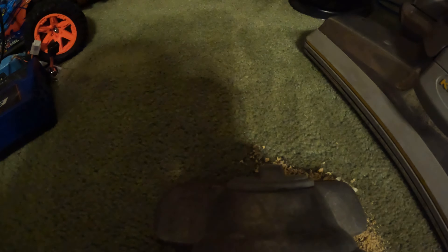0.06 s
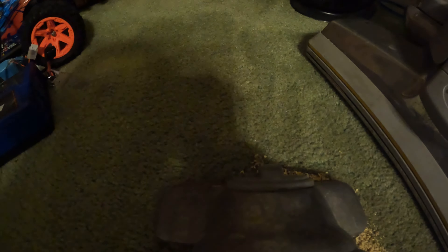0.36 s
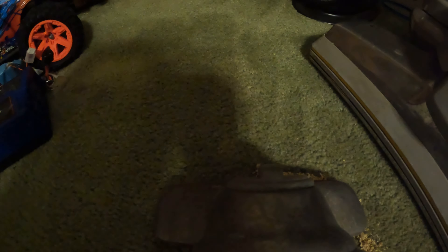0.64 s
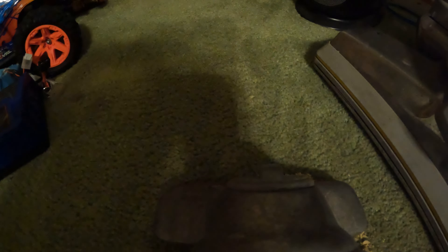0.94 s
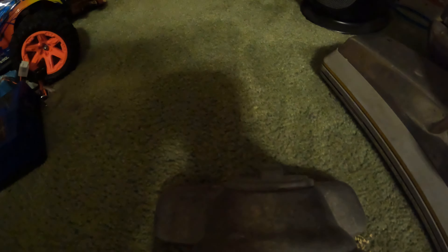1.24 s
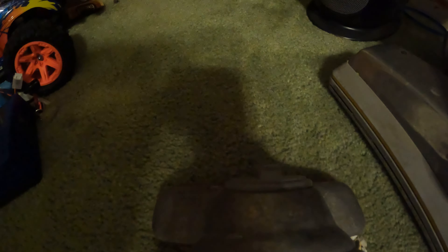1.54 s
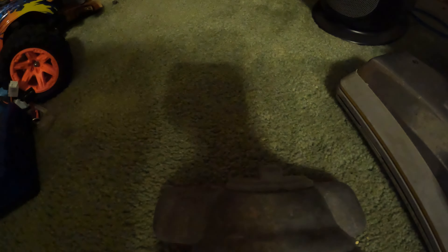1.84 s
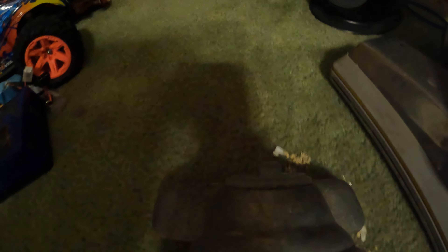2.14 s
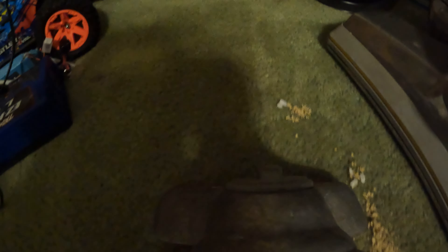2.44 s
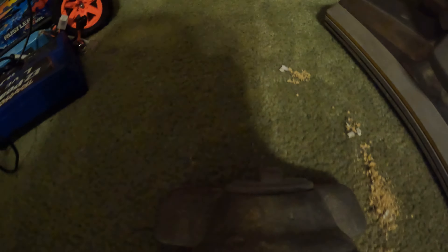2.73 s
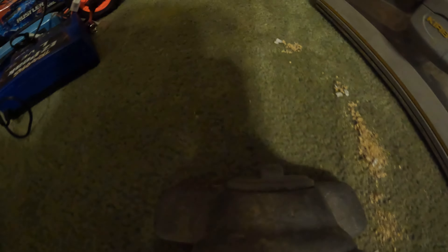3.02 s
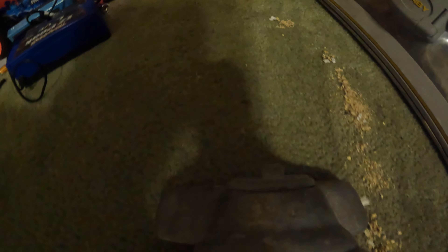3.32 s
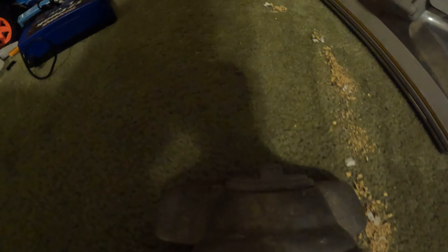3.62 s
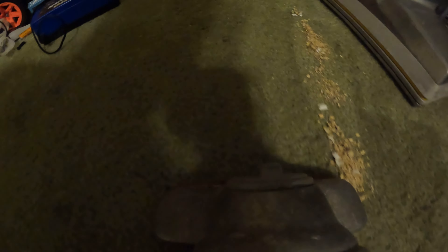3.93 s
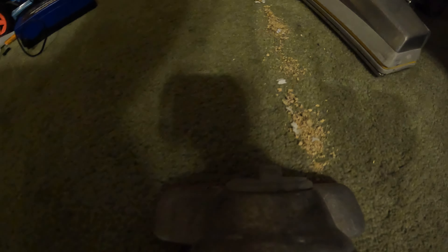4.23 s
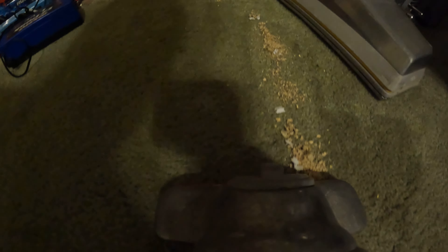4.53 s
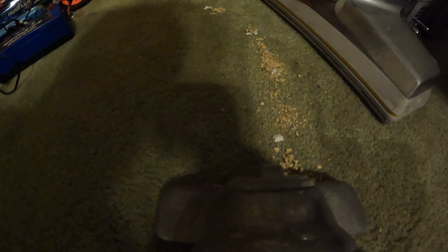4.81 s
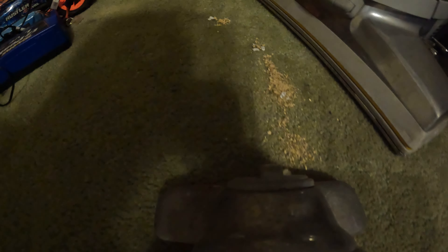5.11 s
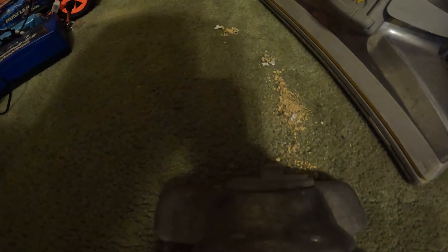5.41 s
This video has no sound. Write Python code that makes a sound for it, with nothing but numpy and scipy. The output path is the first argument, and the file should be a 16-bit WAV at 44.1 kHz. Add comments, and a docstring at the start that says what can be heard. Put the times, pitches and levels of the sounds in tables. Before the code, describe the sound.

An upright vacuum cleaner runs over carpet with a steady motor hum and rushing air, crumbs ticking up its plastic intake.

```python
"""An upright vacuum cleaner is pushed over carpet in a small room, picking up spilled crumbs.
From the start its motor hums at the rotation rate and beats against the mains ripple, turbulent air
rushes through resonant ducts, the belt-driven brush roll drones, and grit rings the plastic intake.
Near 2 s the roll digs in; drawn back, it runs faster and louder while the grit thins out.
Near 4.4 s the cleaner is pushed again, the roll digs in briefly, and the last crumbs follow after 5 s."""
import sys
import numpy as np
from scipy import signal
from scipy.fft import rfft, irfft
from scipy.io import wavfile
from scipy.ndimage import map_coordinates

SR = 44100
rng = np.random.default_rng(int(sys.argv[2]) if len(sys.argv) > 2 else 0)


def store_wav(level_fs):
    """Save 16-bit WAV to argv[1]."""
    pcm = np.round(np.clip(np.atleast_2d(level_fs), -1, 1) * 32767)
    wavfile.write(sys.argv[1], SR, pcm.T.astype(np.int16))


N = 249606
TIME = np.arange(N) / SR
FREQS = np.fft.rfftfreq(N, 1 / SR)
SIDE = np.array([[.5], [-.5]])  # shares a difference between left and right


def from_db(db):
    return 10 ** (np.asarray(db) / 20)


def unit_rms(x):
    return x / np.sqrt(np.mean(x ** 2) + 1e-20)


def in_time(curve):
    """Linear interpolation of a curve at every sample."""
    return np.interp(TIME, *np.transpose(curve))


def in_frequency(curve):
    """Interpolation of a spectrum on a log-frequency axis."""
    hz, value = np.transpose(curve)
    return np.interp(np.log1p(FREQS), np.log1p(hz), value)


def drift(corner_hz):
    """Low-pass noise: a slow random fluctuation of unit rms."""
    return unit_rms(irfft(rfft(rng.standard_normal(N)) / (1 + (FREQS / corner_hz) ** 2), N))


def bump(centre_s, half_s):
    """A Gaussian pulse of height 1."""
    return np.exp(-((TIME - centre_s) / half_s) ** 2)


def shaft_angle(speed_hz):
    """Angle is the time integral of rotation rate."""
    return 2 * np.pi * np.cumsum(speed_hz) / SR


def stereo_tone(phase, rms_db, pan_db, lead_rad):
    """A sinusoid placed by level and phase differences between the sides."""
    return np.sqrt(2) * from_db(rms_db + SIDE * pan_db) * np.cos(phase + SIDE * lead_rad)


# rotation rate of the motor: t/s, f/Hz
MOTOR_SPEED = [(0.0, 247.4), (0.59, 246.91), (1.84, 248.24), (2.94, 249.83), (4.83, 250.46), (5.13, 248.46),
               (5.66, 248.18)]


def motor_motion(ripple_hz=120, first_throb_s=0.02703, choke_db_per_hz=0.13):
    """Rotor phase, mains ripple phase and flow level. Fan loading: choked, it spins up and moves less air."""
    speed = in_time(MOTOR_SPEED)
    rotor = shaft_angle(speed) - 2 * np.pi * (speed[0] - 2 * ripple_hz) * first_throb_s
    ripple = 2 * np.pi * ripple_hz * TIME
    flow_db = 0.08 - choke_db_per_hz * (speed - speed.mean())
    return rotor, ripple, flow_db


# tones at order * rotation rate + sideband * ripple rate: order, sideband, level/dB, left-right/dB
MOTOR_TONES = [(0, 1, -47.5, -2), (-1, 4, -40.2, -5), (0, 2, -29.8, -5), (1, 0, -20.8, -7),
               (2, -2, -40.9, -6), (0, 3, -44, -2), (1, 1, -42.5, 1), (2, -1, -32.6, 0), (3, -3, -42.2, -4),
               (1, 2, -36.5, -2), (2, 0, -30.4, -3), (1, 3, -35.3, -1), (2, 1, -29.1, 1),
               (3, -1, -32.6, -2), (4, -3, -37, -4), (0, 6, -41.5, -8), (1, 4, -37, -6), (2, 2, -31.2, -12),
               (3, 0, -25.6, -13), (4, -2, -35.5, -8), (5, -4, -37.5, -3), (2, 3, -43, -6),
               (3, 1, -42.4, -9), (3, 2, -44, 2), (3, 3, -46.3, 0), (5, 0, -39.5, -2), (6, -1, -42.8, -5),
               (4, 5, -43, 0), (6, 1, -41, 2)]
# clusters by ripple multiple: lead on the throb/rad, warble/rad (0 beats in level, pi / 2 in pitch)
CLUSTER_BEATS = {2: (-0.95, -0.95), 4: (0.9, 1.8), 5: (-0.7, 1.45), 6: (-1.72, 1.72)}


def motor_hum(rotor, ripple):
    """Modulation: torque ripple gives rotor harmonics sidebands; neighbours beat at about 7-10 Hz."""
    start = rng.uniform(0, 2 * np.pi, 32)
    out = 0
    for order, sideband, db, pan_db in MOTOR_TONES:
        cluster = 2 * order + sideband  # nearest multiple of the ripple rate
        _, strongest = max((level, k) for k, m, level, _ in MOTOR_TONES if 2 * k + m == cluster)
        ahead, warble = CLUSTER_BEATS.get(cluster, (0, np.pi / 2))
        offset = ahead * (order - strongest) + warble * abs(order - strongest)
        phase = order * rotor + sideband * ripple + start[cluster] + offset
        waver_db = (0.14 + 0.12 * order) * drift(1.7)
        out += stereo_tone(phase, db - waver_db, pan_db, lead_rad=0.89)
    return out


def fan_whine(rotor, ripple, sideband_spread=3.26, size=1024):
    """Double periodicity, in rotor angle and ripple phase, splits each high harmonic into sidebands."""
    orders, sidebands = np.arange(5, 26)[:, None], np.arange(-6, 7)
    phases = rng.uniform(0, 2 * np.pi, (len(orders), len(sidebands)))
    lines = np.zeros((size, size // 8), complex)
    lines[orders, sidebands] = np.exp(-.5 * (sidebands / sideband_spread) ** 2 + 1j * phases)
    pattern = np.fft.ifft2(lines).real  # pressure over one rotor turn and one ripple cycle
    where = [phase / (2 * np.pi) % 1 * steps for phase, steps in zip((rotor, ripple), pattern.shape)]
    return unit_rms(map_coordinates(np.pad(pattern, (0, 1), mode="wrap"), where, order=1))


def room(x, wet_db, t60_s=0.13):
    """Reverberation: reflections off carpet and furniture decay exponentially, different on each side."""
    t = TIME[:N // 16]
    tail = rng.standard_normal((2, len(t))) * from_db(-60 * t / t60_s) * (t > .003)
    tail /= np.sqrt(np.sum(tail ** 2, axis=1, keepdims=True))
    return from_db(wet_db) * signal.fftconvolve(np.atleast_2d(x), tail, axes=1)[:, :N]


# spectral density of the rushing air: f/Hz, relative level/dB
AIR_SPECTRUM = [(20, -74), (130, -74.6), (220, -57), (450, -54), (800, -54), (1000, -62.5), (1750, -61.5),
                (2050, -72), (3300, -75.5), (5500, -80.5), (6800, -89), (8200, -100), (9000, -106.5),
                (15000, -128)]
# resonances of ducts and housing: f/Hz, width/Hz, gain/dB
DUCT_MODES = [(518, 52, 3.5), (756, 170, 6.5), (1310, 187, 5), (1553, 233, 7.5), (2286, 113, 8),
              (2769, 503, 19.5), (3594, 340, 9), (4040, 200, 7), (4966, 310, 7.5), (5453, 170, 10.5),
              (6150, 190, 6), (7700, 577, 9)]
# bands of hiss that swell with the motor's throb: f/Hz, half width/Hz, depth, lead on the throb/rad
THROB_BANDS = [(1500, 230, 0.11, 2.8), (2650, 680, 0.18, 3.4), (3760, 710, 0.18, 1.1),
               (5420, 780, 0.48, 2.1), (7200, 990, 0.09, 0.43)]
# level difference of the air noise: f/Hz, left-right/dB
AIR_BALANCE = [(60, 1.5), (87, -6.5), (130, -1), (180, -1), (270, -6.5), (390, 1), (570, -4), (820, -5),
               (1190, -2.5), (1740, 2.5), (2520, 6), (3660, -1), (5330, -2.5), (7740, 0)]
# phase difference of the air noise: f/Hz, lead of the left/rad
AIR_LEAD = [(0, 0.36), (260, 0.73), (950, 0.1), (1210, 1), (1890, -0.97), (2240, -0.95), (2500, 0.12),
            (3360, -1.5), (3700, -1.77), (4050, -1.86), (4390, 0.88), (5250, -0.31), (5860, 0.1),
            (7920, 0.039)]


def airflow(rotor, ripple, flow_db, gain_db=-1.5, whine_db=-12.0):
    """Turbulence: broadband noise, pulsed by fan turn and ripple, is coloured by duct resonance."""
    pulse_db = 1.5 * np.cos(rotor) + 2.43 * np.cos(ripple) + 0.85 * drift(30)
    turbulence = unit_rms(from_db(pulse_db) * rng.standard_normal(N))
    jet = from_db(flow_db) * (turbulence + from_db(whine_db) * fan_whine(rotor, ripple))
    direct = rfft(jet)
    slip = rotor - 2 * ripple  # the hiss swells once per cycle of this phase
    for hz, half_width, depth, ahead in THROB_BANDS:
        swell = np.exp(2 * np.cos(slip + ahead))
        swell = unit_rms(swell - swell.mean()) / np.sqrt(2)
        band = np.exp(-((FREQS - hz) / half_width) ** 2)
        direct += depth * band * rfft(jet * swell)
    reflected = rfft(room(irfft(direct, N), wet_db=-12))
    heard = direct * np.exp(1j * SIDE * in_frequency(AIR_LEAD)) + reflected
    ducts_db = sum(db / (1 + (2 * (FREQS - hz) / width) ** 2) for hz, width, db in DUCT_MODES)
    colour_db = in_frequency(AIR_SPECTRUM) + ducts_db + SIDE * in_frequency(AIR_BALANCE)
    return np.sqrt(SR / 2) * irfft(heard * from_db(gain_db + colour_db), N)


# the roll digs in at the end of a stroke: t/s, half length/s, slowing/Hz
BRUSH_STALLS = [(2.021, 0.4, 2.8), (4.46, 0.1088, 5.4)]


def brush_motion(pull_start_s=2.23, pull_end_s=4.35, turnaround_s=0.04, pushed_hz=82.9, pushed_db=-30.5):
    """Friction: the pile slows the roll; drawn back, the nozzle lifts and it runs freer and louder."""
    lift = .5 * (np.tanh((TIME - pull_start_s) / turnaround_s)
                 - np.tanh((TIME - pull_end_s) / turnaround_s))
    overshoot_hz = 3.6 * np.exp(-np.maximum(TIME - pull_start_s, 0) / 0.33)  # on coming free of the pile
    drag_hz = sum(slowing * bump(s, half_s) for s, half_s, slowing in BRUSH_STALLS)
    uneven_pile_hz = 0.393 * drift(2.4)
    change_hz = lift * (2.0 + overshoot_hz) - (1 - lift) * drag_hz + uneven_pile_hz
    return pushed_hz + change_hz, pushed_db + 2.5 * lift + 0.5 * change_hz


# overtones of the brush roll: order, level/dB
BRUSH_HARMONICS = [(2, -45.5), (3, -43.5), (4, -33), (5, -45), (6, -41.5), (8, -43), (9, -44.5),
                   (10, -44.5)]


def brush_roll(pan_db=-3.5):
    """Forced vibration: the roll shakes the nozzle once a turn; overtones flutter as bristles catch."""
    speed_hz, db = brush_motion()
    turn = shaft_angle(speed_hz)
    out = stereo_tone(turn, db + 0.55 * drift(8), pan_db, lead_rad=.15)
    for order, order_db in BRUSH_HARMONICS:
        phase = order * turn + 0.045 * order * drift(4.0) + rng.uniform(0, 2 * np.pi)
        swell_db = 0.81 * (db - db.mean()) * (2 / order) ** 2  # low orders follow the fundamental
        flutter_db = 2.0 * drift(3.1)
        out += stereo_tone(phase, order_db + swell_db + flutter_db, pan_db, lead_rad=0.76)
    return out


def ring(clicks, hz, t60_s):
    """Damped oscillator: a unit impulse starts a decaying sine of height 1."""
    r, w = from_db(-60 / (t60_s * SR)), 2 * np.pi * hz / SR
    return signal.lfilter([0, np.sin(w)], [1, -2 * r * np.cos(w), r * r], clicks + 1e-18)


# modes of the plastic intake: f/Hz, relative level/dB, T60/s
INTAKE_MODES = [(3100, 0.5, .006), (3830, 1.5, 0.0046), (5070, 2, .006), (6140, 2, 0.0069),
                (6800, -2, 0.0059), (7470, 0, .008), (7900, 1.5, 0.0096), (8400, -12, 0.0059),
                (9800, -11.5, .005), (10100, -12.5, 0.0056), (12000, -11.5, .006), (13000, -18, .004)]


def intake(clicks, spread_db, side_spread=0.48):
    """Modal superposition: each impact excites the modes with its own strengths, unequal left and right."""
    at = np.flatnonzero(clicks)
    weight_db = 20 * np.log10(clicks[at] / clicks[at].mean())
    out = 0
    for hz, db, t60_s in INTAKE_MODES:
        # heavier grains stay in contact longer and favour the low modes
        body_db = 0.58 * np.maximum(weight_db, 0) * max(np.log2(8000 / hz), 0)
        polarity = rng.choice([-1, 1], len(at))
        strength = polarity * from_db(db + body_db + spread_db * rng.standard_normal(len(at)))
        hits = np.zeros((2, N))
        hits[:, at] = clicks[at] * strength * (1 + side_spread * rng.standard_normal((2, len(at))))
        out += ring(hits, hz, t60_s)
    return out + room(out, wet_db=-14)


# fine dirt going up the intake: t/s, relative level/dB
DIRT_FLOW = [(0.0, -63.5), (0.5, -61.5), (0.94, -64.5), (1.45, -60), (2.03, -70), (3.37, -73.5),
             (3.55, -85), (4.65, -78), (5.22, -62), (5.66, -68.5)]


def fine_dirt(grains_per_s=1500, clump_db=4.5, gain_db=13.5, spray_db=-36.5):
    """Shot noise: small grains strike the intake in random clumps, louder in a spray around each crumb."""
    arrivals = rng.random(N) < grains_per_s * from_db(clump_db * drift(15)) / SR
    sizes = from_db(2.0 * np.minimum(rng.exponential(1, N), 4))
    patter = unit_rms(intake(arrivals * sizes, spread_db=2.5))
    spray = sum(from_db(db + spray_db) * bump(s, half_s=0.011) for s, db in CRUMB_HITS)
    return from_db(gain_db) * (from_db(in_time(DIRT_FLOW)) + spray) * patter


# larger crumbs hitting the intake: t/s, relative level/dB
CRUMB_HITS = [(0.0508, -34), (0.6145, -28.5), (0.8689, -31.5), (0.9023, -32.5), (1.174, -34),
              (1.296, -30.5), (1.417, -30.5), (1.5727, -29.5), (1.618, -38), (1.6288, -28), (1.8522, -33.5),
              (1.934, -33.5), (2.0433, -33.5), (2.2922, -42.5), (2.4952, -41), (2.9135, -39), (5.0908, -33),
              (5.4274, -30), (5.434, -24)]


def crumbs(gain_db=-9.0, mean_gap_s=.0019, bounce_loss_db=1.2, impacts=14):
    """Inelastic collision: each crumb ricochets up the intake, losing energy at every bounce."""
    clicks = np.zeros(N)
    for s, db in CRUMB_HITS:
        gaps = rng.exponential(mean_gap_s, impacts)
        times = s + np.cumsum(gaps) - gaps[0]
        at = np.clip(times * SR, 0, N - 1).astype(int)
        clicks[at] = from_db(db + gain_db - bounce_loss_db * np.arange(impacts))
    return intake(clicks, spread_db=1.0)


def scene():
    """Superposition: one motor drives hum and airflow; brush roll, dirt and crumbs add to them."""
    rotor, ripple, flow_db = motor_motion()
    return motor_hum(rotor, ripple) + airflow(rotor, ripple, flow_db) + brush_roll() + fine_dirt() + crumbs()


def record(dry, rolloff_hz=14000, cutoff_hz=15800):
    """Low-pass filtering: the highest treble fades, then the top is cut steeply."""
    soft = signal.sosfilt(signal.butter(2, rolloff_hz, fs=SR, output="sos"), dry)
    return signal.sosfilt(signal.ellip(10, .1, 80, cutoff_hz, fs=SR, output="sos"), soft)


dry = scene()
out = record(dry)
store_wav(out)
```